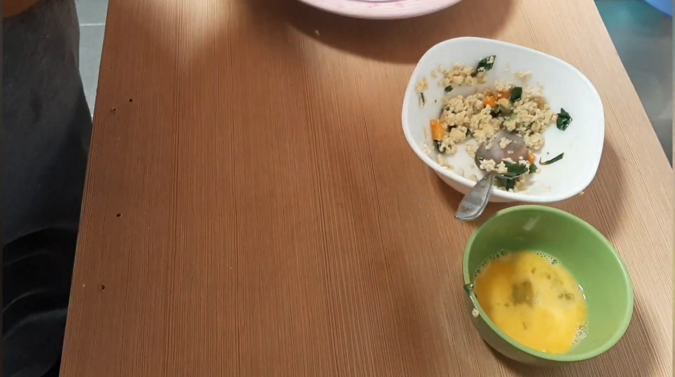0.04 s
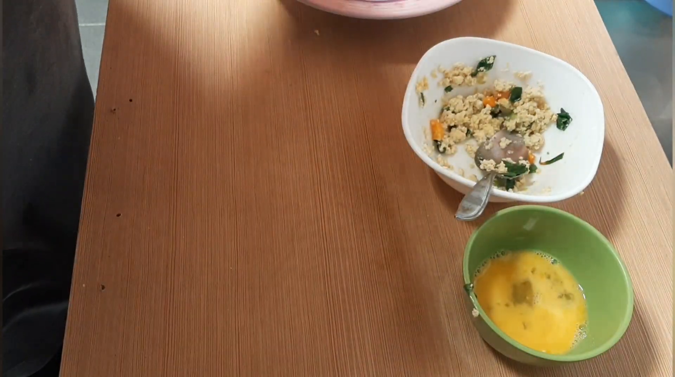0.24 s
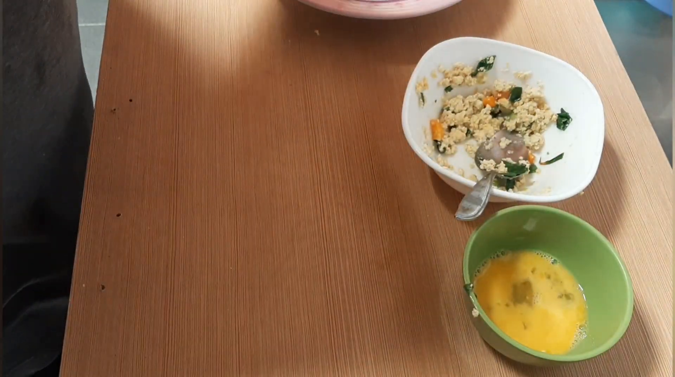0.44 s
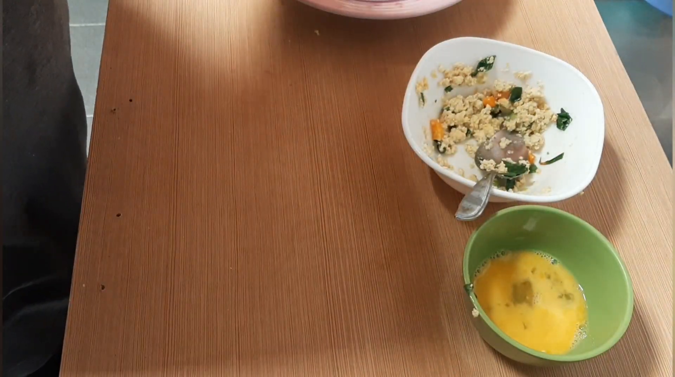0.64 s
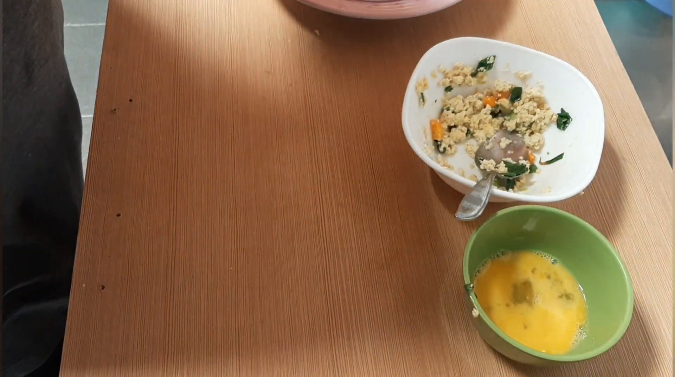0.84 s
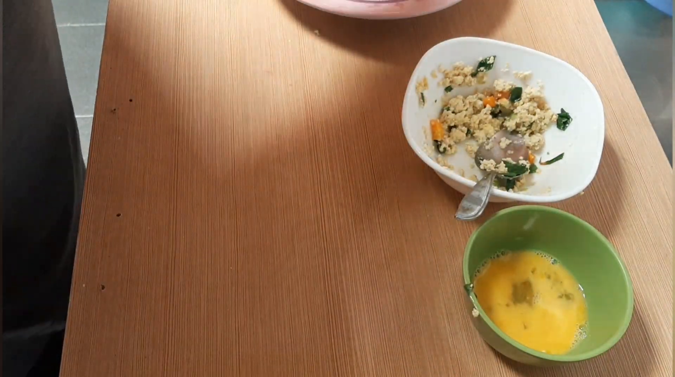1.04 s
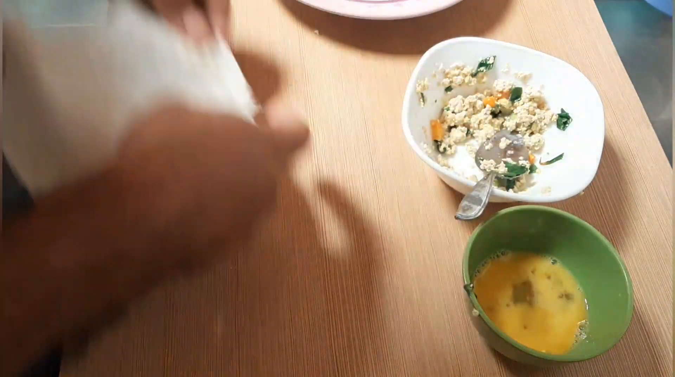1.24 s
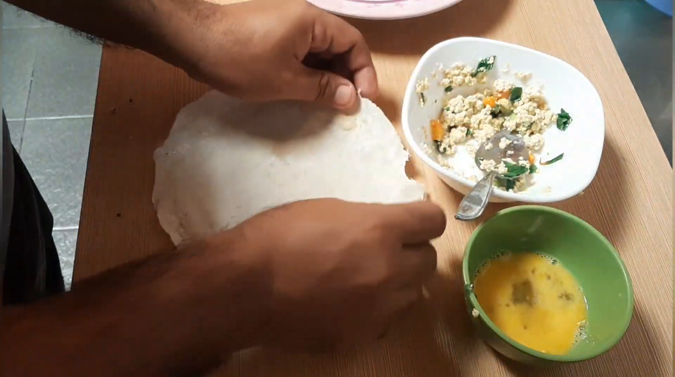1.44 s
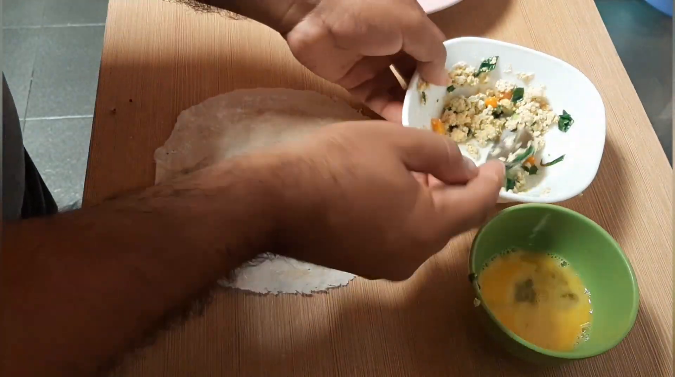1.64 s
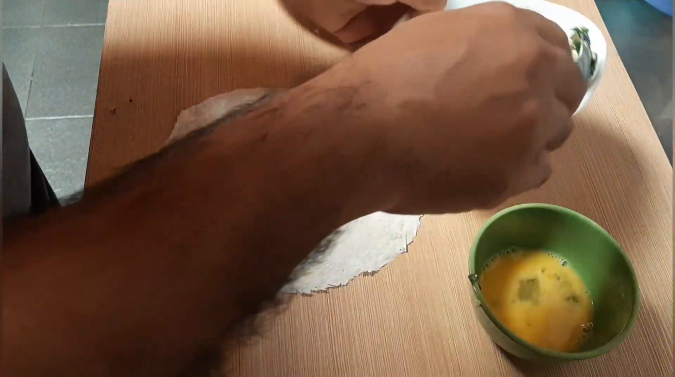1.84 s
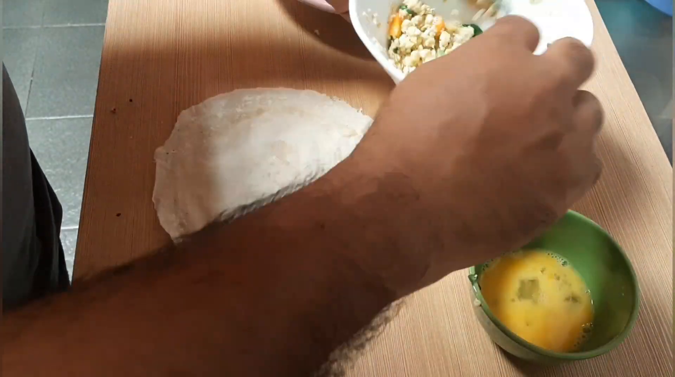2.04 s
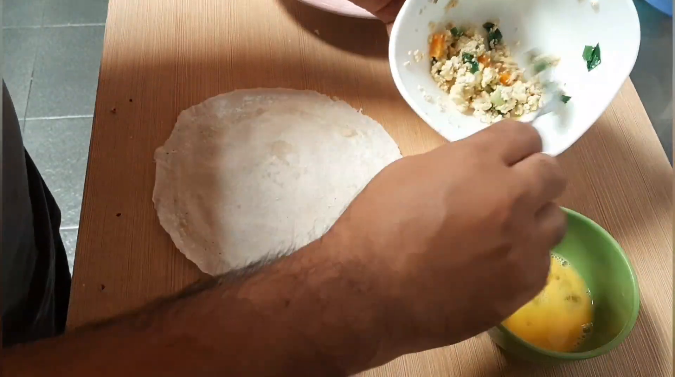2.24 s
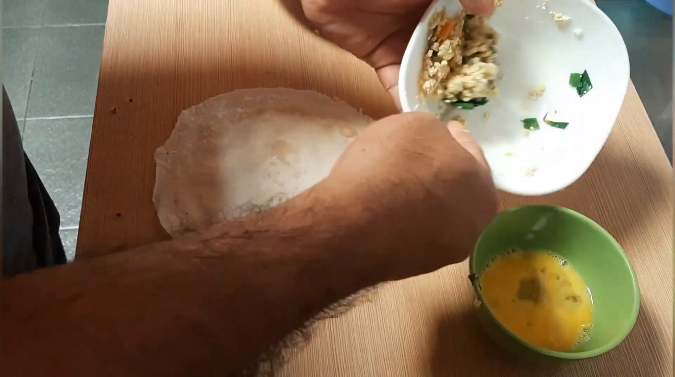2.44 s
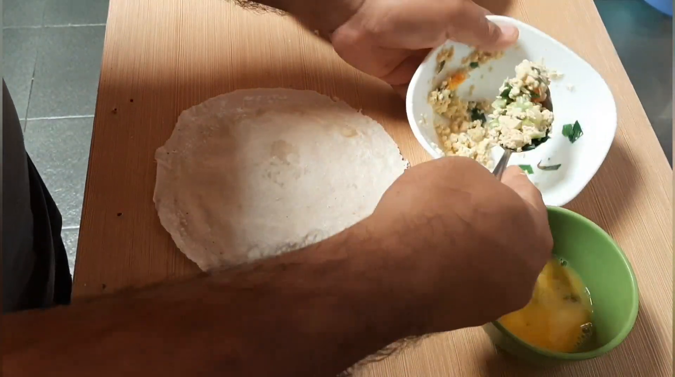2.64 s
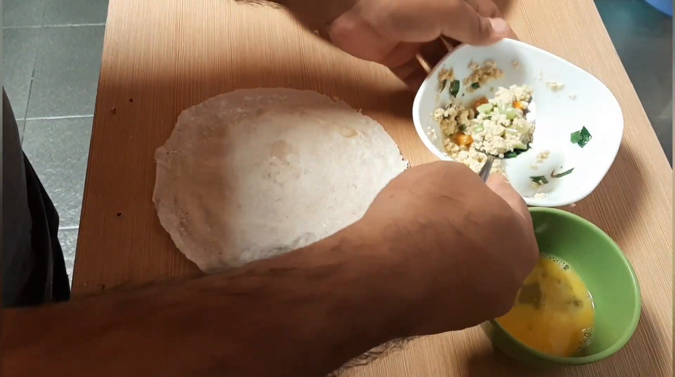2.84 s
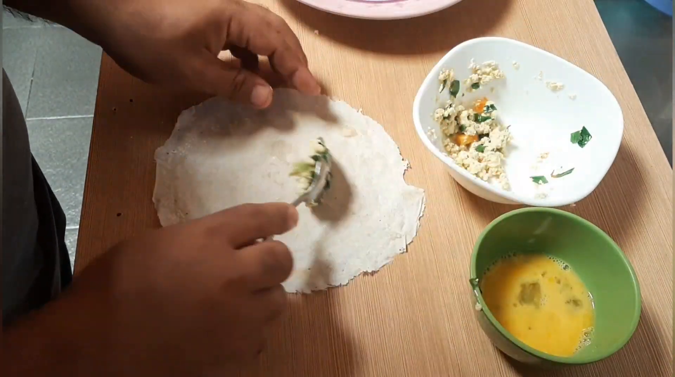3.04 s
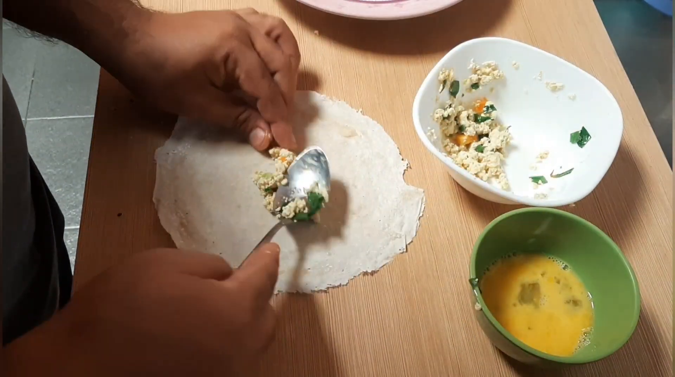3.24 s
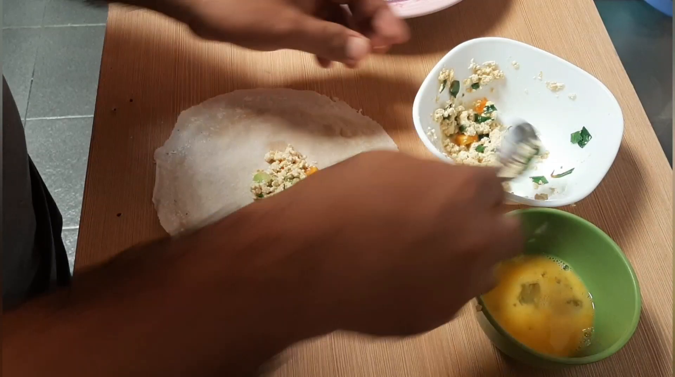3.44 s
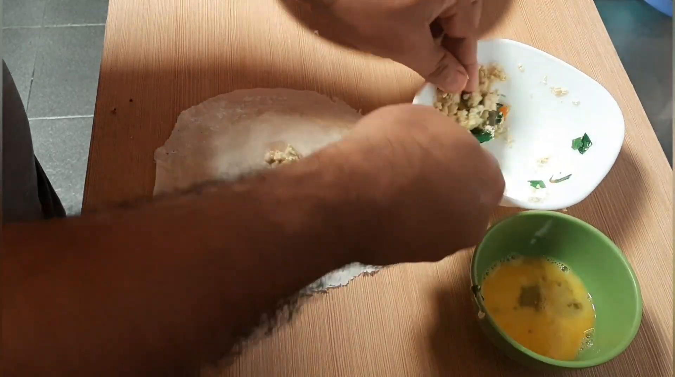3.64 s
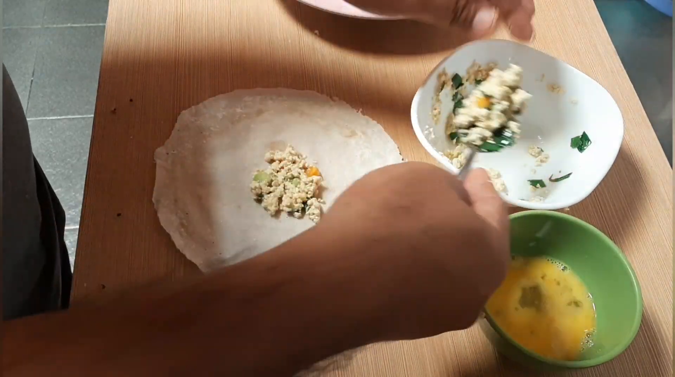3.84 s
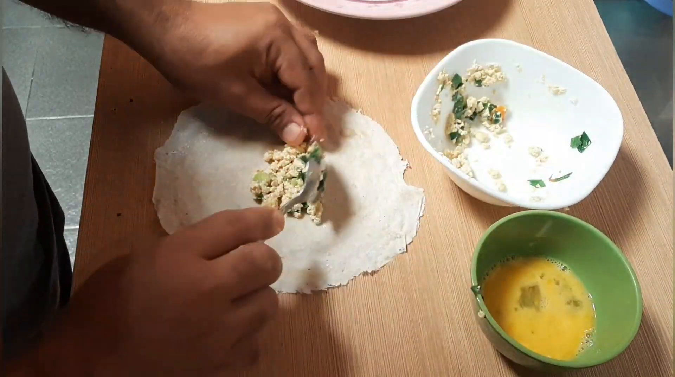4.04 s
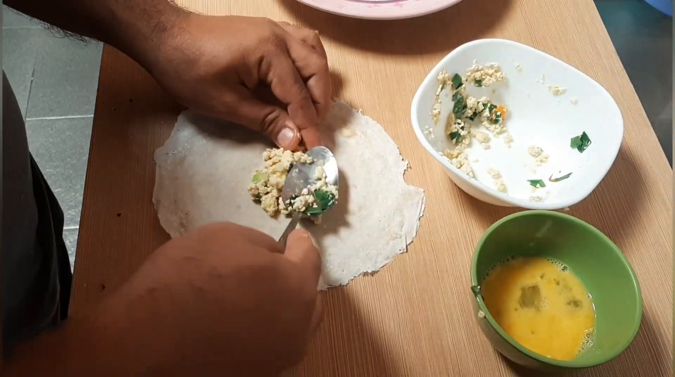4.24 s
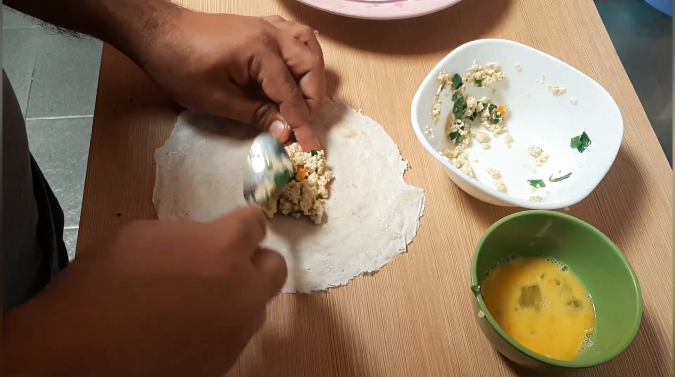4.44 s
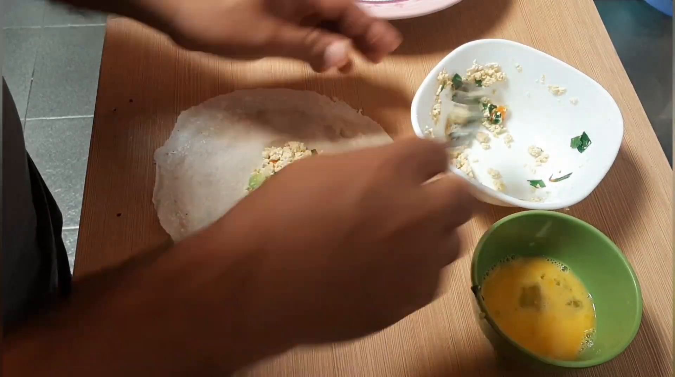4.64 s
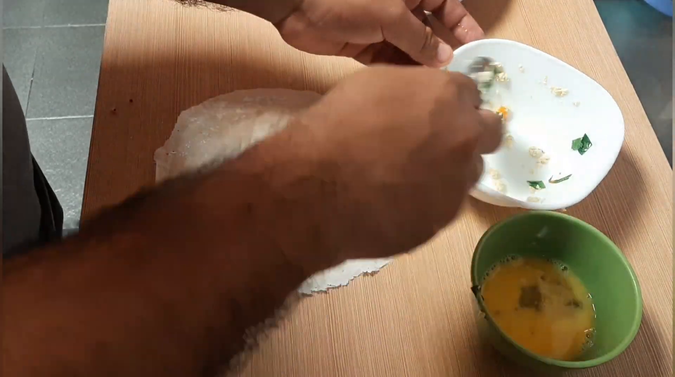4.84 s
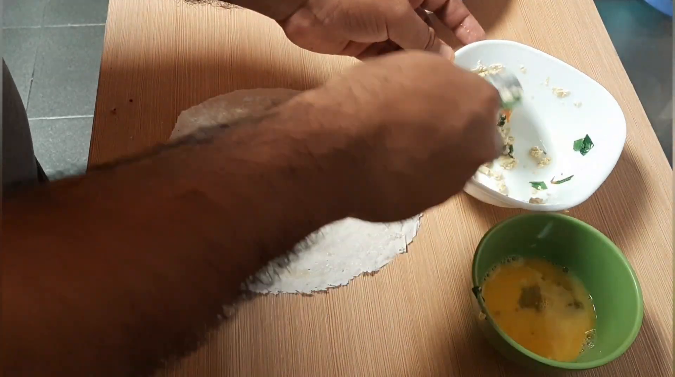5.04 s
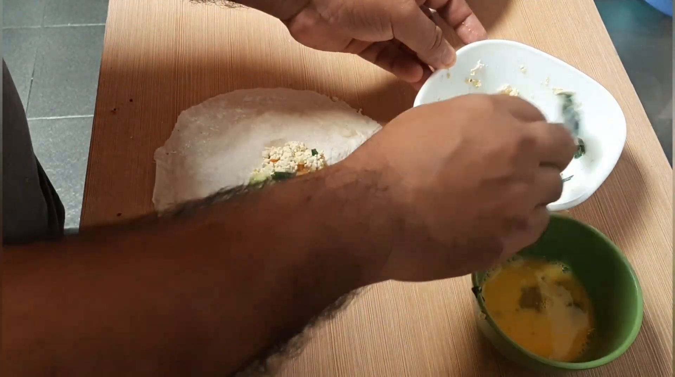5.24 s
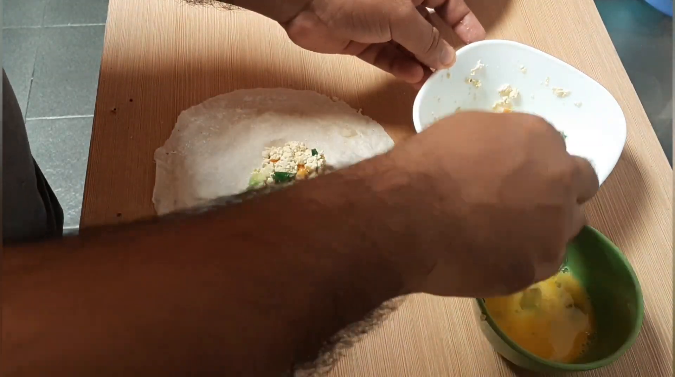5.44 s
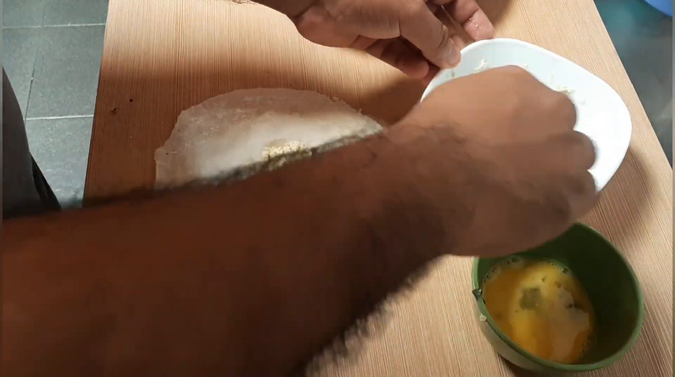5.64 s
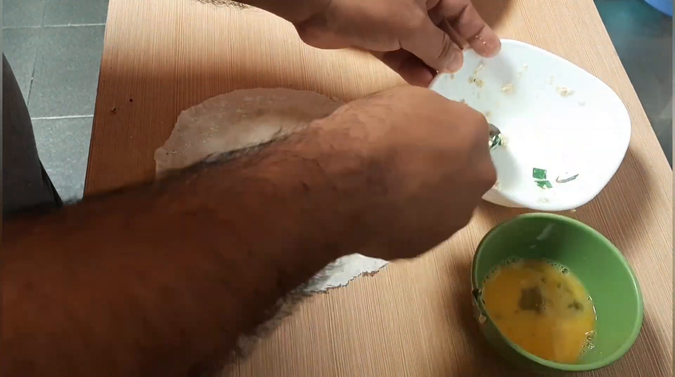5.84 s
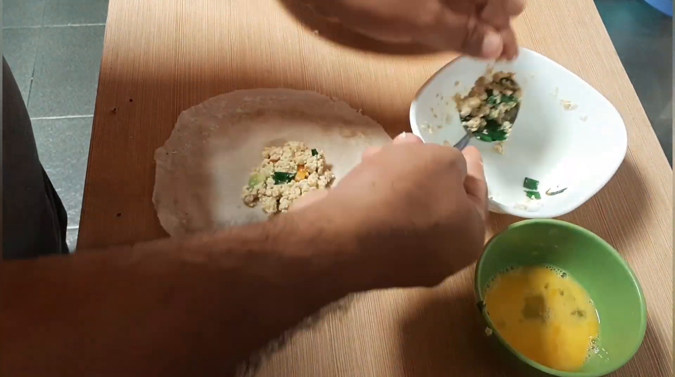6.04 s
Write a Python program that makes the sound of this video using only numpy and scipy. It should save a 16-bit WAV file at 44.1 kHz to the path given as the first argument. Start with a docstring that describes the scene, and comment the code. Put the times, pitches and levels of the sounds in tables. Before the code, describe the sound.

Over a steady low hum and faint hiss in a small, hard kitchen, things brush softly on a wooden table. A metal spoon then clinks and scrapes in a ceramic bowl, and the bowl is put down with a quick double knock. Light taps, muffled by food, give way to a short lull and a final run of sharper, ringing clinks and scrapes. Everything is heard from close by.

```python
"""A steel spoon scoops filling from a ceramic bowl on a wooden kitchen table, close to the microphone.
The bowl is lifted, scraped, set down with two knocks and scraped again; the spoon clinks, drags and squeaks on the glaze.
Food and fingers damp the ring; a small hard room with a low hum answers each blow."""
import sys
import numpy as np
from scipy import signal
from scipy.fft import rfft, irfft
from scipy.io import wavfile
from scipy.ndimage import uniform_filter1d

SR = 44100
rng = np.random.default_rng(int(sys.argv[2]) if len(sys.argv) > 2 else 0)


def put_to_file(sound):
    """Save the sound as 16-bit audio at rate SR, in the file named by the first command-line argument."""
    columns = np.atleast_2d(sound).T  # one column per channel
    safe = np.clip(columns, -1, 1)
    whole_steps = np.round(safe * 32767)
    wavfile.write(sys.argv[1], SR, whole_steps.astype(np.int16))


N = 269266

# spoon and bowl ringing together: (Hz, dB, t60 s)
BOWL = [(988, -9, .13), (1250, -15, .04), (1585, -7, .06), (2045, -12, .08), (2250, -1, .23), (2480, -13, .05),  # fixed
        (3230, -15, .05), (3825, -8, .08), (3922, -5, .18), (4020, -18, .06), (4420, -16, .07), (5250, -13, .06), (5660, -11, .05), (5800, -10, .09),  # fixed
        (5865, -3, .17), (5975, -9, .1), (6290, -11, .1), (6650, -15, .07), (8185, -13, .13), (9105, -17, .09), (9355, -11, .1),  # fixed
        (9660, -14, .08), (10025, -10, .09), (10378, -5, .13), (10798, -8, .13), (11370, -12, .08), (11760, -9, .11),  # fixed
        (11960, -9, .12), (12460, -9, .1), (13775, -13, .09), (15070, -17, .12), (15720, -12, .07)]  # fixed
# the bowl's foot on the table top: (Hz, dB, t60 s)
TABLE = [(104, -5, .17), (130, -10, .08), (180, -7, .1), (305, -4, .09), (425, -14, .07), (590, -5, .08), (692, 0, .16), (738, -1, .12),  # fixed
         (850, -2, .08), (912, -4, .07), (1075, -4, .07), (1325, -4, .06), (1520, -6, .07), (2130, -14, .06), (3220, -20, .05), (3600, -20, .04)]  # fixed
# crowded, quickly dying overtones of each: (Hz, dB per Hz)
BOWL_CRACK = [(100, 3.5), (450, -10), (1000, 3), (1600, 2), (2400, 4), (3000, 1.5), (4000, -3), (4800, -6.5), (6000, -4.5), (7400, -7), (8600, -16.5), (9800, -7), (12200, -17), (13300, -1), (16000, -19)]
TABLE_CRACK = [(30, -36), (110, 17), (260, -6), (420, 2.5), (800, 2.5), (1500, -5.5), (3300, -7), (6000, -13.5), (10000, -51), (16000, -54)]
# spoon strikes the bowl: (s, level dB, body dB, treble dB, Hz favoured by the point of contact, its lift dB, ring factor, crack dB)
CLINKS = [(2.0895, -21, -14.5, 6, 985, 17.5, 1, 11.5), (2.2200, -35, -2.5, 9, 6270, 13, 0.14, 14), (2.2687, -20, -10.5, -2.5, 1020, 9, 0.74, -0.5),
          (2.2700, -24, 5.5, -1, 6130, 13, 1, -5), (2.2712, -24, -19, -10, 3830, 6, 0.64, 0), (2.2752, -22, -2, -3, 2210, 11, 0.47, -1), (2.2908, -22, -9.5, 8, 15700, 14, 0.54, 14),
          (2.3038, -26.5, 4.5, 6, 5750, 17, 0.11, 4), (2.3630, -37.5, -7, -10, 2900, -8, 0.12, 8), (2.6630, -44, 12, -5, 2200, 18, 0.097, 0),
          (3.5170, -35, 1, 13, 6300, 22, 0.1, 8), (3.5298, -37, 17.5, 15.5, 6260, 34, 0.73, 8),
          (4.9044, -25, -17, -2, 11100, 5, 0.81, 4), (4.9848, -19, -9, -1, 7700, 13.5, 0.38, 0.5), (4.9852, -20.5, -12, -1.5, 5730, 6, 0.5, -5),
          (5.0787, -29, -8.5, -2, 8400, 7, 0.17, 1), (5.3882, -11, 3, -3, 3960, 15.5, 0.54, 0.5), (5.3895, -14.5, -20.5, 4, 2270, 14, 0.76, -5),
          (5.7072, -24.5, -8, 0.5, 960, 17, 1, 0), (5.7085, -27.5, -8, -2, 5600, 3, 1, 2), (5.7130, -24.5, -10, 0, 4040, 16, 0.94, -3), (5.733, -27.5, -10, 7, 6370, 16, 0.54, 13),
          (5.806, -32, -7, 5, 6500, 27, 0.25, 19)]
# spoon drags over the glaze: (s, level dB, rise s, fade s, brightness dB, favoured Hz, its lift dB)
SCRAPES = [(1.751, -46, 0.0062, 0.022, 2, 6300, 22), (1.86, -44.5, 0.018, 0.027, 2, 13800, 16.5), (1.983, -38, 0.011, 0.023, 8, 6660, 8),
           (2.191, -38, 0.0062, .052, 2.5, 8800, 3), (2.303, -33, 0.016, 0.031, 5, 5800, 5.5), (2.358, -41.5, 0.026, 0.0073, 1.5, 2810, 16),
           (2.63, -37, 0.02, 0.0073, 8, 1650, 9), (3.514, -32, 0.006, 0.044, 16, 6430, 25.5), (3.602, -40.5, 0.013, 0.016, -7, 1920, 19),
           (4.767, -36.5, 0.0073, 0.028, -2.5, 5900, -2.5), (4.882, -27, 0.019, 0.034, 4, 13300, -1), (4.918, -34.5, 0.0066, 0.017, -7, 2320, 10),
           (4.98, -34, 0.018, 0.02, -3, 8100, 19), (5.076, -38.5, 0.0082, 0.016, 4, 8250, 15), (5.163, -33, 0.0039, 0.018, 2, 9000, 16),
           (5.511, -51, 0.0078, 0.02, 1, 6240, 3), (5.58, -34, 0.0075, 0.014, 7, 13900, 15.5), (5.628, -45.5, 0.018, 0.0095, 3, 2360, 17),
           (5.715, -32, 0.0036, 0.015, -3.5, 12400, 6), (5.79, -36.5, 0.01, 0.018, 12, 6650, 18), (5.811, -43, 0.019, 0.023, -7.5, 3000, 8),
           (5.931, -36.5, 0.0072, 0.02, -3.5, 1700, 17)]
# bowl and spoon bump the table: (s, level dB, favoured Hz, ring factor)
KNOCKS = [(1.6742, -39, 1670, 0.093), (1.699, -43, 915, 0.53), (1.718, -36.5, 1560, 0.12), (1.731, -45.5, 1490, 0.17),
          (2.673, -21, 764, 1), (2.6745, -30, 1850, 0.1), (2.6856, -30, 1620, 0.17), (2.7660, -20, 840, 0.48), (2.7678, -21.5, 1310, 0.3), (2.7741, -34.5, 147, 0.67),
          (4.616, -50, 1400, 0.06), (5.389, -46, 850, 0.9), (5.733, -44.5, 694, 0.75), (6.019, -47, 670, 0.4)]
# hands, dough and food brush the table: (s, level dB, length s, favoured Hz)
BRUSHES = [(0.024, -58.5, 0.093, 2020), (0.106, -60.5, 0.038, 5040), (0.261, -60, 0.034, 4670), (0.625, -65.5, 0.11, 2080),
           (0.409, -53.5, 0.075, 12000), (1.288, -53.5, 0.026, 2430), (1.523, -53, 0.059, 1120), (1.674, -45, 0.032, 910), (3.004, -52.5, 0.037, 487),
           (3.512, -46, 0.033, 699), (3.61, -45, 0.033, 900), (3.709, -53, 0.05, 70), (4.605, -54, 0.13, 407),
           (5.932, -40.5, 0.031, 694)]
# the spoon's edge sticks and slips: (s, length s, first Hz, last Hz, dB)
SQUEAKS = [(1.913, 0.032, 2880, 2000, -52.5), (5.638, 0.0307, 2940, 1770, -42.5)]
AIR = [(25, -5), (60, -12.5), (90, 0.5), (160, -9.5), (270, -15), (400, -17), (520, -14), (740, -22.5), (1250, -21), (2800, -22.5), (4800, -22.5), (7000, -27.5), (8600, -37), (11500, -30.5), (16000, -33)]  # (Hz, dB per Hz)
AIR_DB = -53.5
WAVER_DB = 3.5  # unsteadiness of the low middle  # fixed
# resonances in the room's drone: (Hz, width Hz, lift dB)
DRONE = [(98, 4, 12), (500, 18, 5), (585, 16, 7), (865, 30, 7), (1040, 40, 5), (1560, 45, 10), (2060, 60, 7)]  # fixed
SAME = [(60, 0.69), (180, 1), (550, 0.27), (1650, -0.2), (5000, -0.024), (15000, -0.077)]  # (Hz, left-right likeness)
ROOM = [(100, 0.11), (700, 0.21), (2500, 0.22), (6000, 0.16), (15000, 0.1)]  # (Hz, t60 s)
# table top and near walls: (delay s, gain)
ECHOES = [(.0031, 0.022), (.0078, 0.14), (.0105, 0.99), (0.0258, .07), (.045, 0.084)]
EDGE_HZ = 16100  # fixed
T = np.arange(SR // 3) / SR
# hand and food damp the bowl; it rings longer as it empties: (s, ring factor)
RING = [(1.8, 0.41), (2.4, 0.054), (3.53, 0.15), (3.64, 0.046), (4.8, 0.8), (5.6, 0.69), (5.8, 0.15)]
PRESS_SHARE = 0.34  # part of a brush's length in which the pressure builds; it fades over the rest
# the softer a contact on wood, the lower its favoured pitch and the duller it is: value at WOOD_HZ, change per octave down
WOOD_HZ = 1000  # fixed
WOOD_BODY_DB, BODY_DB_PER_OCT = 15, 24
WOOD_TREBLE_DB, TREBLE_DB_PER_OCT = 24.5, -4.5
SCRAPE_BODY_DB, SCRAPE_TREBLE_DB = -6, -7.5
KNOCK_LIFT_DB = 10.5
BRUSH_LIFT_DB = 3  # a soft, wide contact hardly favours one pitch  # fixed
SCRAPE_RING = 0.55  # a sliding spoon damps the bowl a little further
SLIP_CRACK_DB = -4  # a slip is softer than a blow  # fixed
# modes above this pitch feel the spoon's pressure fully
UPPER_HZ = 3800  # fixed
TABLE_LOW_HZ = 60.4  # the table top radiates little below this
# the spoon ringing by itself when it bounces free: (Hz, dB, t60 s)
SPOON = [(1640, -4, .09), (3230, -7, .06), (4011, 0, .12), (4680, -7, .08), (6450, -5, .08), (6800, -8, .2), (8204, -10, .13), (9367, -12, .08), (13780, -2, .11)]  # fixed
# light taps that ring only the spoon: (s, level dB, body dB, treble dB, Hz favoured, its lift dB, ring factor, crack dB)
TAPS = [(2.6415, -33.5, 8.5, 2, 4750, 12, 0.97, 14.5), (2.6745, -38.5, 11, -14, 6850, 12, 1, 11), (3.6418, -28.5, -5.5, 0.5, 3270, 15.5, 0.3, 7), (5.5872, -24, -11, 5, 3900, 12, 0.59, 2)]
# food weighs the bowl down and lowers its upper modes: (s, detuning %)
LOAD = [(2.3, -2), (4.7, 0)]  # fixed
DRAIN_DB = None
DRAIN_S = None
# a surface that stays in touch drains the ring at first: dB lost after a blow, dB lost after a slip, time constant s
BLOW_DRAIN_DB, SLIP_DRAIN_DB, TOUCH_S = 13, 7, .011  # fixed
KNOCK_CRACK_DB = 7.5  # crack of a knock against its modes
# the level dips briefly: (s, length s, dB)
DIP = (0.167, 0.014, -18)  # fixed


def amp(db):
    """Decibels to gain."""
    return 10 ** (np.asarray(db) / 20)


def evened(x):
    """Scales to rms 1."""
    return x / np.sqrt(np.mean(x ** 2) + 1e-20)


def read(points, hz):
    """Reads a table on a log-frequency axis."""
    f, value = np.transpose(points)
    return np.interp(np.log(hz + 1), np.log(f + 1), value)


def add(mix, s, sound):
    """Mixes a stereo sound in at time s."""
    part = mix[:, round(s * SR):][:, :sound.shape[1]]
    part += sound[:, :part.shape[1]]


def coloured(x, db_at):
    """Filters by a gain in dB given as a function of frequency."""
    return irfft(rfft(x) * amp(db_at(np.fft.rfftfreq(x.shape[-1], 1 / SR))), x.shape[-1])


def at_level(x, db):
    """Sets the rms of the loudest hundredth of a second."""
    return amp(db) * x / np.sqrt(uniform_filter1d((x ** 2).mean(0), SR // 100).max())  # fixed


def contact(body_db, treble_db, spot_hz, lift_db, octaves=0.073):
    """The place and hardness of a contact decide which modes it wakes."""
    slope = [(2300, body_db), (3700, 0.055), (7000, 0.077), (10000, treble_db)]
    return lambda hz: read(slope, hz) + lift_db * np.exp(-.5 * (np.log2((hz + 1) / spot_hz) / octaves) ** 2)


def ring(modes, crack, crack_db, crack_t60, spread, colour, damping, detune, drain_db):
    """One blow: decaying modes and a short crack; the treble reaches the two microphones out of step."""
    hz, db, t60 = np.transpose(modes)[:, :, None]
    damping = np.clip(damping, .1, 1.1)  # fixed
    upper = np.minimum(hz / UPPER_HZ, 1) ** 2
    hz = hz * (1 + upper * detune / 100 + .012 * (1.1 - damping) ** 2 * rng.standard_normal(hz.shape))  # pressing detunes the modes  # fixed
    db = db + colour(hz) + 2 * np.minimum(hz / 8000, 1) * rng.standard_normal(hz.shape)  # high modes depend on the spot  # fixed
    turn = rng.choice([-1, 1], hz.shape) * np.exp(2j * np.pi * hz * T) * amp(db - 60 * T / (t60 * damping))  # fixed
    skew = np.exp(.5j * spread * upper * rng.choice([-1, 1], hz.shape))  # fixed
    touching = 1.6 * amp(-drain_db * (.7 + .3 * upper) * (1 - np.exp(-T / TOUCH_S)))  # fixed
    tones = (touching * np.array([turn * skew, turn / skew])).imag.sum(1)
    mid, side = rng.standard_normal((2, len(T)))
    side = coloured(side, lambda f: read([(1000, -6), (UPPER_HZ, 0)], f))  # fixed
    noise = np.cos(spread / 2) * mid + np.sin(spread / 2) * np.array([side, -side])
    noise = coloured(evened(coloured(noise, lambda f: read(crack, f))), colour)
    return tones + noise * amp(crack_db - 60 * T / crack_t60)  # fixed


def bowl(s, colour, damping, crack_db, drain_db):
    """Steel on glazed ceramic, tuned by the food in the bowl at time s."""
    detune = np.interp(s, *np.transpose(LOAD))
    return ring(BOWL, BOWL_CRACK, crack_db, crack_t60=.03, spread=1.4, colour=colour, damping=damping, detune=detune, drain_db=drain_db)  # fixed


def table(s, colour, damping, crack_db, drain_db):
    """A blow through the wooden top, which soaks up the ring quickly."""
    return ring(TABLE, TABLE_CRACK, crack_db, crack_t60=.045, spread=.7, colour=colour, damping=damping, detune=0, drain_db=1.8 * drain_db)  # fixed


def strikes(rows, body, rise):
    """Single blows; the ring builds up while the two surfaces touch."""
    out = np.zeros((2, N))
    for s, db, *colour, damping, crack_db in rows:
        sound = body(s, contact(*colour), damping, crack_db, BLOW_DRAIN_DB)
        add(out, s, at_level(sound * (1 - np.exp(-T / rise)), db))
    return out


def drags(rows, body, slips_per_s, uneven_db, damping_at, grip_db=3.5):
    """A stroke is a shower of tiny slips, each ringing the pressed body; the grip comes and goes."""
    out = np.zeros((2, N))
    for s, db, rise, fade, *colour in rows:
        pressure = np.minimum(T / rise, 1) * np.exp(-np.maximum(T - rise, 0) / fade)
        grip = evened(uniform_filter1d(rng.standard_normal(len(T)), size=180))
        slips = (rng.random(len(T)) < slips_per_s / SR) * rng.choice([-1, 1], len(T))
        force = pressure * slips * amp(grip_db * grip + uneven_db * np.minimum(rng.exponential(1, len(T)), 3))
        slip = body(s, contact(*colour), damping_at(s), SLIP_CRACK_DB, SLIP_DRAIN_DB)
        sound = signal.fftconvolve(force[None], slip, axes=1)
        add(out, s, at_level(sound, db))
    return out


def squeaks(jitter=0.22):
    """Slips fall into step and sink in pitch as the spoon slows."""
    out = np.zeros((2, N))
    for s, length, first_hz, last_hz, db in SQUEAKS:
        count = int(length * SR)
        waver = uniform_filter1d(rng.standard_normal(len(T)), size=8)[:count]
        hz = np.geomspace(first_hz, last_hz, count) * (1 + 2 * jitter * waver)
        tone = np.sin(2 * np.pi * np.cumsum(hz) / SR) * np.hanning(count)
        add(out, s, at_level(np.array([tone, tone]), db))
    return out


def air(waver_hz=450, drift_db=2.3, left_db=-1.5):
    """Steady kitchen drone and hiss, alike at both microphones in the bass; the low middle wavers."""
    hz = np.fft.rfftfreq(2048, 1 / SR)  # fixed
    a, b, c, d, patches = rng.standard_normal((5, N // 512 + 5, len(hz)))  # fixed
    patches = evened(uniform_filter1d(uniform_filter1d(patches, size=9, axis=0), size=2, axis=1))
    waver = WAVER_DB * patches / (1 + np.log2((hz + 1) / waver_hz) ** 2)
    waver += drift_db * evened(uniform_filter1d(patches, size=70, axis=1))  # the hiss drifts in broad patches
    db = read(AIR, hz) + sum(lift / (1 + ((hz - f) / width) ** 2) for f, width, lift in DRONE)
    same, left = np.clip(read(SAME, hz), -1, 1), a + 1j * b
    z = np.array([left, same * left + np.sqrt(1 - same ** 2) * (c + 1j * d)]) * amp(db + waver)
    noise = signal.istft(z.transpose(0, 2, 1), nperseg=2048, noverlap=1536)[1][:, :N]  # fixed
    return evened(noise) * amp(AIR_DB + np.array([[left_db], [-left_db]]))


def room(x, wet_db, echo_db, left_db, build=0.013):
    """A few near reflections, then a diffuse tail that dies sooner in the treble; the source sits to the right."""
    hz, t, z = signal.stft(rng.standard_normal((2, SR // 2)), SR, nperseg=256)
    tail = signal.istft(z * amp(-60 * t / read(ROOM, hz)[:, None]), SR, nperseg=256)[1]  # fixed
    tail *= np.minimum(np.arange(tail.shape[1]) / SR / build, 1) ** 2
    response = amp(wet_db) * tail / np.linalg.norm(tail[0])
    for delay, gain in ECHOES:
        response[:, int(delay * SR * rng.uniform(.95, 1.05))] += gain * amp(echo_db)
    return (x + signal.fftconvolve(x, response, axes=1)[:, :N]) * amp([[left_db], [-left_db]])


def ring_at(s):
    """How freely the bowl rings at time s."""
    return np.interp(s, *np.transpose(RING))


def stroke(length):
    """Rise and fade times of a stroke's pressure."""
    share = np.clip(PRESS_SHARE, .05, .9)  # fixed
    return share * length, (1 - share) * length


def on_wood(hz, lift_db):
    """Colour of a contact with the table, all from its softness."""
    octaves = np.log2(WOOD_HZ / hz)
    return WOOD_BODY_DB + BODY_DB_PER_OCT * octaves, WOOD_TREBLE_DB + TREBLE_DB_PER_OCT * octaves, hz, lift_db


def clinks():
    """The spoon hits the bowl; each spot and grip gives its own colour and ring."""
    return strikes(CLINKS, bowl, rise=0.0005) + strikes(TAPS, steel, rise=0.0005)  # fixed


def scrapes():
    """The sliding spoon sounds bright on bare glaze, dull through food."""
    rows = [(s, db, rise, fade, SCRAPE_BODY_DB - bright_db, SCRAPE_TREBLE_DB + bright_db, hz, lift_db)
            for s, db, rise, fade, bright_db, hz, lift_db in SCRAPES]
    return drags(rows, bowl, slips_per_s=2500, uneven_db=-3.0, damping_at=lambda s: SCRAPE_RING * ring_at(s))


def knocks():
    """The bowl's foot meets the table; it rings on one edge and is damped once it sits flat."""
    rows = [(s, db, *on_wood(hz, KNOCK_LIFT_DB), damping, KNOCK_CRACK_DB) for s, db, hz, damping in KNOCKS]
    return strikes(rows, table, rise=0.0001)


def brushes():
    """Soft things slide over the table and damp it."""
    rows = [(s, db, *stroke(length), *on_wood(hz, BRUSH_LIFT_DB)) for s, db, length, hz in BRUSHES]
    return drags(rows, table, slips_per_s=1200, uneven_db=-12.5, damping_at=lambda s: .12)


def steel(s, colour, damping, crack_db, drain_db):
    """The spoon alone; it bounces free, so less of its ring is drained."""
    return ring(SPOON, BOWL_CRACK, crack_db, crack_t60=.03, spread=1.4, colour=colour, damping=damping, detune=0, drain_db=drain_db / 2)  # fixed


def scene():
    """Spoon, bowl and table in the kitchen."""
    spoon = clinks() + scrapes() + squeaks()
    wood = signal.sosfilt(signal.butter(2, TABLE_LOW_HZ, "high", fs=SR, output="sos"), knocks() + brushes())
    return room(spoon, wet_db=-13.0, echo_db=-17.5, left_db=-0.56) + room(wood, wet_db=-9.5, echo_db=-22, left_db=-1.5) + air()


def record(dry):
    """A brief dip in level, then the recorder's low cut and band limit."""
    s, length, db = DIP
    dry = dry * amp(db * uniform_filter1d(1. * (abs(np.arange(N) / SR - s) < length / 2), size=90))  # fixed
    dry = signal.sosfilt(signal.butter(2, 40, "high", fs=SR, output="sos"), dry)  # fixed
    return signal.oaconvolve(dry, signal.firwin(255, EDGE_HZ, window=("kaiser", 9), fs=SR)[None], "same")  # fixed


dry = scene()
out = record(dry)
put_to_file(out)
```